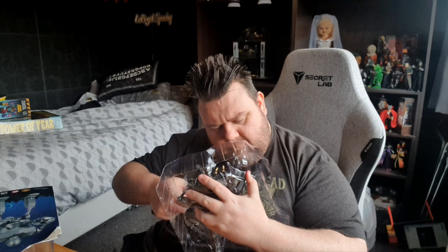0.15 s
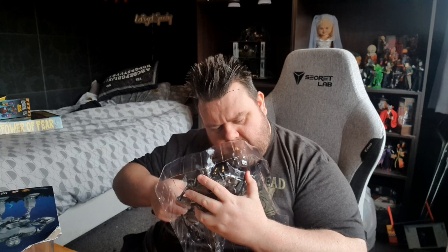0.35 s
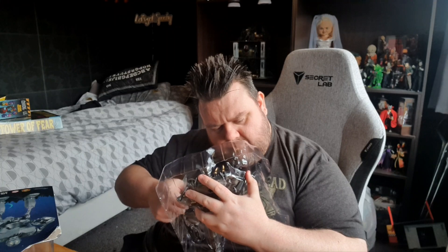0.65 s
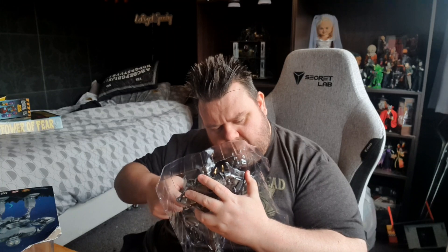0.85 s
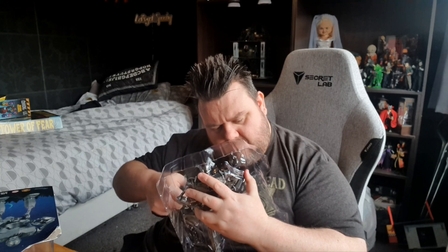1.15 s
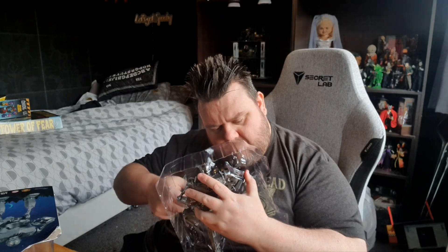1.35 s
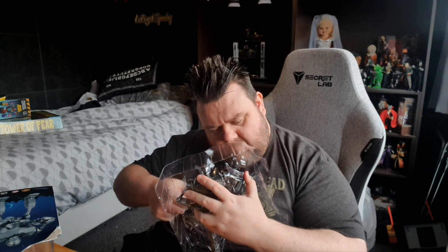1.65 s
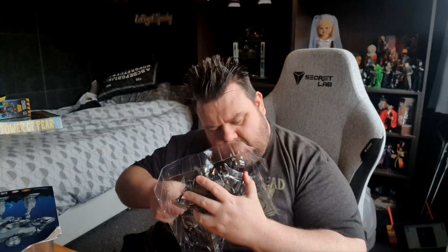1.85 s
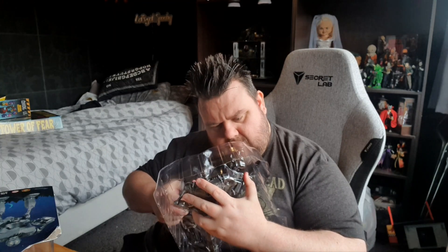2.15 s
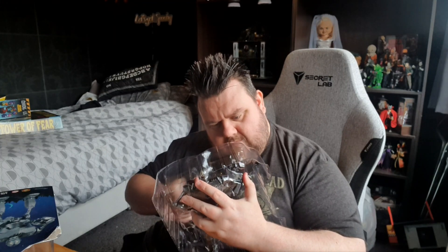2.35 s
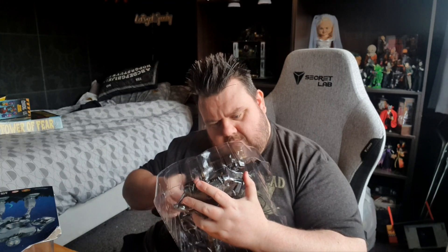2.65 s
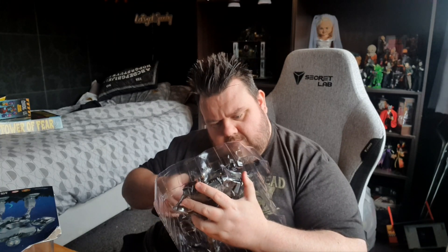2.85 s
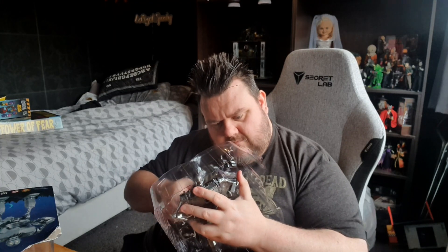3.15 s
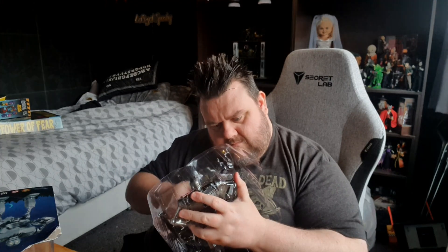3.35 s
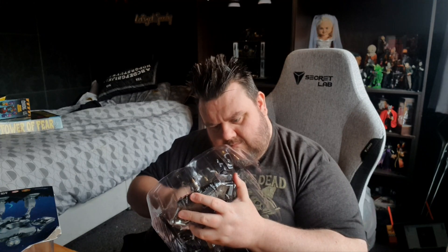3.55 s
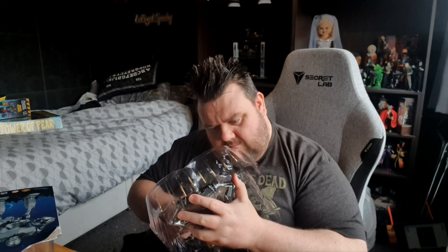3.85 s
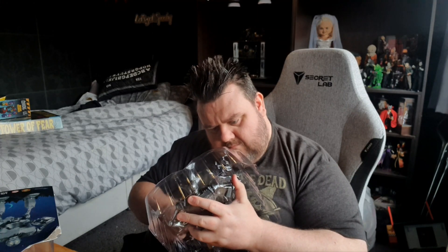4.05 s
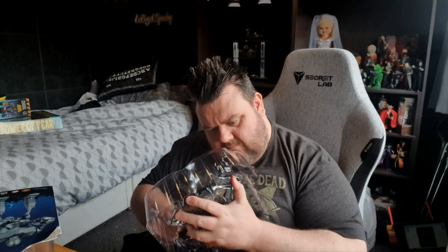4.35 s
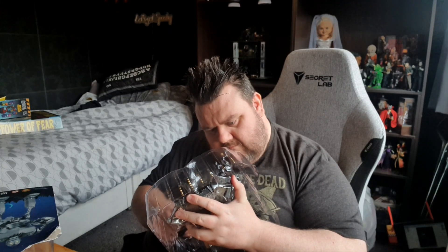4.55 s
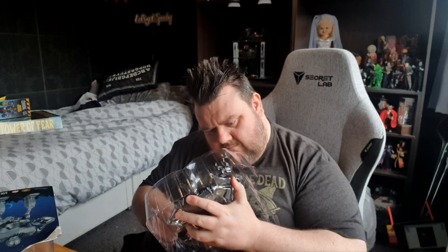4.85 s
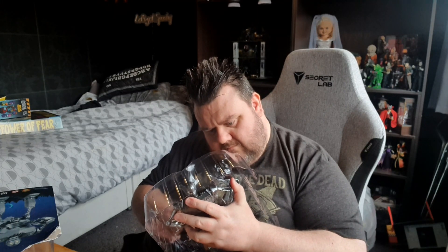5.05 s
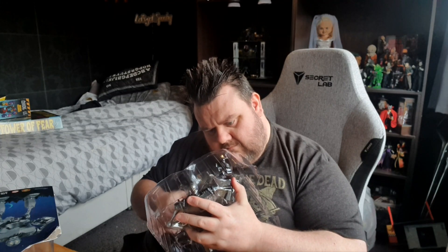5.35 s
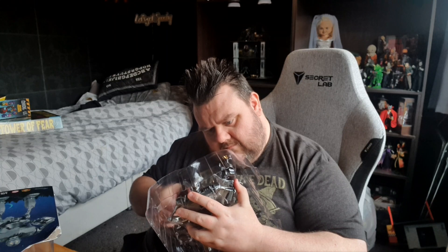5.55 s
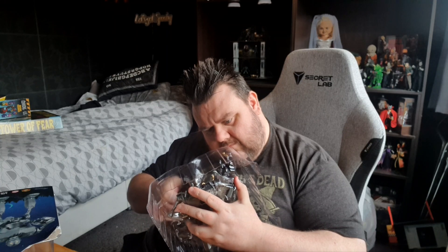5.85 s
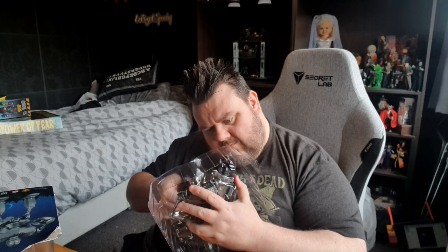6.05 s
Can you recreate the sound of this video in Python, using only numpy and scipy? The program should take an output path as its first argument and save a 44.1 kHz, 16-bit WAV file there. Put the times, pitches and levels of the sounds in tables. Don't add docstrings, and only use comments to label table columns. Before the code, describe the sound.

A stiff plastic tray is flexed close to a stereo microphone in a small carpeted bedroom. Sharp cracks and hollow pops come in uneven clusters during the first two seconds, then a lull, a few duller creaks around three, a crackling flurry past four, and one very loud snap at five. Small ticks follow. A low computer fan hums throughout.

```python
import sys
import numpy as np
from scipy import signal
from scipy.fft import rfft, irfft
from scipy.io import wavfile
from scipy.ndimage import uniform_filter1d

SR = 44100
rng = np.random.default_rng(int(sys.argv[2]) if len(sys.argv) > 2 else 0)


def decibels_to_gain(level_db):
    exponent = np.asarray(level_db, float) / 20
    return 10 ** exponent


def waveform_to_disk(signal):
    frames = np.transpose(np.atleast_2d(signal))
    scaled = np.clip(frames, -1, 1) * 32767
    samples = np.round(scaled).astype(np.int16)
    wavfile.write(sys.argv[1], SR, samples)


N = 273619


def rms_one(x):
    return x / np.sqrt(np.mean(x ** 2) + 1e-30)


def peak_one(x):
    return x / np.max(np.abs(x))


def at_hz(points, hz):
    table_hz, values = np.transpose(points)
    return np.interp(np.log(np.maximum(hz, 1)), np.log(table_hz), values)


def filtered(x, order, hz, kind):
    return signal.sosfilt(signal.butter(order, hz, kind, fs=SR, output="sos"), x)


def click_at(s):
    return np.arange(N) == round(s * SR)


def ring(clicks, hz, t60):
    r, w = decibels_to_gain(-60 / (t60 * SR)), 2 * np.pi * hz / SR
    return signal.lfilter([0, np.sin(w)], [1, -2 * r * np.cos(w), r * r], clicks + 1e-18)


def causal(spectrum, size=2048):
    log_gain = np.log(decibels_to_gain(at_hz(spectrum, np.fft.rfftfreq(size, 1 / SR))) + 1e-6)
    cepstrum = irfft(log_gain)
    cepstrum[1:size // 2] *= 2
    cepstrum[size // 2 + 1:] = 0
    return rms_one(irfft(np.exp(rfft(cepstrum)))) / np.sqrt(size)


def drift(rate):
    r = np.exp(-80 * np.pi * rate / SR)
    noise = rng.standard_normal(N // 40 + 2002)
    slow = signal.lfilter([1], [1, -2 * r, r * r], noise)[2000:]
    return np.interp(np.arange(N) / 40, np.arange(len(slow)), rms_one(slow))


def two_ears(mid, side, alike):
    return np.sqrt(1 + alike) * mid + np.sqrt(1 - alike) * side * [[1], [-1]]


# frequency in Hz, left-right likeness from 0 to 1.
LIKENESS = [(60, 0.91), (180, 0.8), (550, 0.79), (1650, 0.044), (4970, 0.029), (15000, 0.03)]


def airy(spectrum):
    hz = np.fft.rfftfreq(N, 1 / SR)
    alike = np.clip(at_hz(LIKENESS, hz), 0, 1)
    mid, side = rfft(rng.standard_normal((2, N)))
    return rms_one(irfft(decibels_to_gain(at_hz(spectrum, hz)) * two_ears(mid, side, alike), N))


# frequency in Hz, level in dB per Hz.
FANS = [(24, -38), (40, -2.5), (127, -7.5), (147, -7), (171, -6.5), (209, -15), (265, -14), (313, -17),
        (370, -11.5), (480, -27.5), (620, -57.5), (1060, -120)]
# frequency in Hz, level in dB per Hz.
HISS = [(400, -20), (500, 0), (640, -4), (800, -8), (1250, -13), (1700, -17), (3900, -22), (4080, -16),
        (4250, -23), (6600, -27), (7600, -32), (12500, -26), (15500, -29), (16200, -60)]
# frequency in Hz, level in dB rms, width of the wander in Hz.
HUM = [(50.6, -62, 15), (78, -63, 6), (120.2, -59, 2), (187.3, -73, 6), (267, -71, 19), (358, -70.5, 12)]


def computer(fans_db=-60, hiss_db=-77):
    out = decibels_to_gain(fans_db) * airy(FANS) + decibels_to_gain(hiss_db) * airy(HISS)
    for hz, level_db, width_hz in HUM:
        phase = 2 * np.pi * np.cumsum(hz + .5 * width_hz * drift(2.7)) / SR
        ear_lag = [[0], [hz / 900]]
        out += decibels_to_gain(level_db + 3.5 + 1.5 * drift(4)) * np.sin(phase + ear_lag)
    return out


# start in seconds, peak in dB, crack in dB, fold pitch in Hz.
SNAPS = [(0.0, -43.5, -19, 885), (0.063, -51.5, -18, 780), (0.442, -16, -9, 697), (0.649, -18, -23, 805),
         (0.708, -27.5, -28.5, 1320), (0.757, -36.5, -31.5, 783), (0.854, -49.5, -18.5, 675),
         (1.057, -36.5, -16.5, 557), (1.067, -23.5, -22, 920), (1.096, -46, -5.5, 910),
         (1.571, -33, -14, 730), (1.926, -17, -17.5, 810), (2.975, -41, -20.5, 746), (3.361, -35, -14, 690),
         (4.377, -43, -16, 800), (4.446, -55, -22, 997), (4.922, -36.5, -18, 774), (4.94, -38.5, -7.5, 897),
         (4.966, -7, -10.5, 707), (5.504, -50, -23.5, 721), (5.602, -55.5, -16.5, 758),
         (5.65, -33, -20, 759)]
# start in seconds, peak in dB, crack in dB,
# fold pitch in Hz.
BRITTLE = [(0.577, -36.5, -8.5, 1260), (0.936, -47.5, -44, 760), (1.333, -45, -6.5, 730),
           (1.416, -48, -32, 715), (1.785, -25, -5.5, 770), (1.87, -18.5, -12.5, 900),
           (1.912, -18, -25, 820), (4.26, -44, -25, 715), (4.424, -45, -25, 840), (5.246, -60, -1, 730),
           (5.736, -50.5, -16, 686)]
# start in seconds, peak in dB, crack in dB, fold pitch in Hz.
FLEXES = [(0.909, -38, -33, 800), (0.995, -36.5, -17.5, 910), (1.245, -51.5, -10.5, 721),
          (1.529, -47.5, -14.5, 748), (3.048, -30.5, -27.5, 1237), (3.096, -32.5, -23, 1235),
          (3.441, -36, -21.5, 750), (3.534, -44.5, -21.5, 600), (4.129, -52.5, -19, 787),
          (4.283, -38, -20.5, 840), (4.329, -28.5, -18, 745), (4.347, -33.5, -12, 703),
          (4.357, -28, -20, 807), (4.399, -30, -19.5, 789), (4.831, -56, -24.5, 823),
          (5.664, -40.5, -12, 639), (5.721, -44.5, -17, 676), (5.846, -34.5, -28, 770),
          (5.911, -56, -11, 1316), (6.133, -53, -10.5, 810)]
# start in seconds, peak in dB.
TICKS = [(1.18, -57.5), (1.389, -59), (1.462, -64), (1.59, -55), (2.849, -64.5), (3.313, -74),
         (3.548, -62.5), (3.669, -61), (4.173, -70), (4.589, -66), (5.561, -72)]


def buckles(middling_db=-40.5):
    ticks = [(s, db, -12, 720) for s, db in TICKS]
    kinds = ((BRITTLE, -3, -4.5), (SNAPS + ticks, -11, 0), (FLEXES, -27, -2))
    rows = []
    for kind, edge_db, share_db in kinds:
        for s, db, crack_db, hz in kind:
            thump_db = -15.5 + share_db - .5 * (db - middling_db)
            rows.append((s, db, thump_db, crack_db, crack_db + edge_db, hz))
    return sorted(rows)


# frequency in Hz, level in dB, t60 in seconds.
PANELS = [(195, -1, 0.058), (337, 1.5, 0.07), (381.8, 1.5, .08), (435.2, 4, 0.085), (630, -3.5, 0.023)]
# frequency in Hz, level in dB per Hz.
CRACK = [(710, -61.5), (1200, -3), (1910, -3), (2060, -3.5), (2560, -2), (3050, -6.5), (3550, -5),
         (7330, -22), (11700, -21.5), (16000, -33)]
# ratio to the fold pitch, level in dB.
FOLD = [(.7, -23), (.86, -6), (1.001, 11.5), (1.219, 6), (1.5, -1.5), (1.899, -28)]


def volley(crack_db, t, volley_db=-3, drag=.28):
    common, gate = rng.standard_normal((2, len(t)))
    echoes = (np.abs(gate) > 1.6) * (.6 * common + .8 * rng.standard_normal((2, len(t))))
    echoes += signal.lfilter([.05], [1, -.95], echoes[::-1] - echoes) / 2
    length_s = .006 * decibels_to_gain(drag * np.clip(-14 - crack_db, 0, 25))
    out = (t == 0) + decibels_to_gain(volley_db) * echoes * np.exp(-(t / length_s) ** 2) * (t > .0003)
    return out / np.sqrt(np.sum(out ** 2) / 6)


def snaps(facing=.5, panels_db=4, crack_gain_db=9, edge_gain_db=9, folds_db=-9, pan_db=-.17, size=4096):
    sent, near, t = np.zeros(N + size), np.zeros((2, N + size)), np.arange(size) / SR
    click = (t == 0) * 1.
    pulse = causal(CRACK, size=size)
    crack, edge = (peak_one(filtered(pulse, 2, 5000, kind)) for kind in ("low", "high"))
    push = np.diff(signal.lfilter([1], [1, -1.7, .7225], click), prepend=0)
    knock = filtered(click, 2, 2500, "low")
    for s, level_db, thump_db, crack_db, edge_db, hz in buckles():
        thump, fold = np.zeros(size), np.zeros(size)
        for panel_hz, db, t60 in PANELS:
            thump += decibels_to_gain(db + 9.9 * rng.standard_normal()) * ring(push, panel_hz, t60)
        for ratio, db in FOLD:
            detune = decibels_to_gain(.3 * rng.standard_normal())
            fold += decibels_to_gain(db) * ring(knock, hz * ratio * detune, 25 / hz)
        snap = decibels_to_gain(thump_db + panels_db) * peak_one(thump) + decibels_to_gain(folds_db) * peak_one(fold)
        snap += decibels_to_gain(crack_db + crack_gain_db) * crack
        snap -= decibels_to_gain(edge_db + edge_gain_db) * edge
        at = round((s + .00067) * SR)
        sent[at:at + size] += decibels_to_gain(level_db) * snap
        aim_db = facing * max(level_db + 16, 0)
        heard = signal.fftconvolve(volley(crack_db, t), [snap], axes=1)[:, :size]
        near[:, at:at + size] += decibels_to_gain(level_db + aim_db) * heard
    return sent[:N], near[:, :N] * decibels_to_gain([[pan_db], [-pan_db]])


# frequency in Hz, level in dB per Hz.
RUB = [(250, -23), (500, 4), (900, 0.5), (1500, -3.5), (2500, -25), (6000, -46)]
# frequency in Hz, level in dB per Hz.
FIZZ = [(900, -27), (2000, 0.5), (3000, 3.5), (5000, -4), (6800, -6), (7800, -24), (16000, -29)]
# moment of most pressure in seconds, rub in dB, seconds to fade 20 dB either side.
STROKES = [(0.03, -77, 1.1), (0.75, -62, 0.04), (1.04, -62, 0.16), (1.36, -65.5, 0.86), (1.588, -62, 0.27),
           (3.0, -68, 1), (3.39, -65, 0.04), (3.53, -65, 0.17), (4.32, -62.5, 0.23), (4.6, -83.5, .5),
           (4.91, -64, 0.24), (5.62, -73, 1), (5.92, -73, 0.8)]


def rustle(per_s=1200, spread_db=3, clump_db=4, fizz_db=-11.5):
    t = np.arange(N) / SR
    rub_db = np.max([db - 20 * np.abs(t - s) / fade_s for s, db, fade_s in STROKES], axis=0)
    sizes = decibels_to_gain(spread_db * np.minimum(rng.exponential(1, N), 4)) * rng.choice([-1, 1], N)
    ticks = sizes * (rng.random(N) < per_s / SR) * decibels_to_gain(clump_db * drift(25))
    rub, fizz = (rms_one(signal.fftconvolve(ticks, causal(colour))[:N]) for colour in (RUB, FIZZ))
    return decibels_to_gain(rub_db - 5) * (rub + decibels_to_gain(fizz_db) * fizz)


# start in seconds, peak in dB, pitch in Hz.
POPS = [(0.445, -25, 400), (0.579, -34, 410), (0.652, -27, 430), (0.707, -29.5, 420), (0.713, -33, 1300),
        (0.909, -35, 900), (1.066, -27, 884), (1.786, -23, 480), (1.788, -22, 850), (1.928, -20, 370),
        (1.929, -21, 800), (3.049, -37, 700), (3.096, -46.5, 328), (3.361, -31, 361), (3.362, -39.5, 720),
        (3.44, -34.5, 378), (3.548, -31, 363), (3.673, -38.5, 351), (4.355, -36, 336), (4.42, -36, 900),
        (4.832, -44, 750), (4.968, -15, 430), (5.664, -28, 626), (5.651, -38, 1320), (5.722, -35, 660),
        (5.847, -43, 1250), (5.912, -48, 1350), (5.846, -36.5, 331), (6.133, -42.5, 462)]


def panel_pops():
    pops = sum(decibels_to_gain(db - 4.5) * ring(click_at(s), hz, 24 / hz) for s, db, hz in POPS)
    return filtered(pops, 2, [200, 1800], "band")


# start in seconds, level in dB, pitch in Hz, t60 in seconds.
TINGS = [
    (3.097, -67, 1850, .3),
    (0.858, -80, 5250, .2),
    (1.54, -70, 3500, .08),
]


def tool():
    return sum(decibels_to_gain(db) * ring(click_at(s), hz, t60) for s, db, hz, t60 in TINGS)


# frequency in Hz, level in dB, t60 in seconds.
BEAMS = [(2530, -10, .025), (3480, -12, .018)]


def beam():
    s = max(SNAPS, key=lambda row: row[1])[0] + .001
    return sum(decibels_to_gain(db) * ring(click_at(s), hz, t60) for hz, db, t60 in BEAMS)


# frequency in Hz, t60 in seconds.
ROOM_T60 = [(150, 0.2), (500, 0.18), (2000, 0.195), (6000, 0.2), (14000, 0.074)]


def room(x, tail_db=-25, build_s=.0055, treble_db=3, size=16384):
    t, edges = np.arange(size) / SR, 60 * 2 ** np.arange(0, 8.6, .5)
    white, tail = rng.standard_normal((2, 2, size)), np.zeros((2, size))
    for k, (low, high) in enumerate(zip(edges, edges[1:])):
        alike = np.clip(at_hz(LIKENESS, low), 0, 1)
        mid, side = filtered(white[k % 2], 2, [low, high], "band")
        decay_db = treble_db * max(np.log2(low / 3000), 0) - 60 * t / at_hz(ROOM_T60, low)
        tail += two_ears(mid, side, alike) * decibels_to_gain(decay_db)
    lumps = uniform_filter1d(rng.standard_normal((2, size)), size=40, axis=1) ** 2
    early = np.exp(-t / .06)
    tail *= rms_one(.35 + lumps / lumps.mean() * early) / rms_one(.35 + np.sqrt(3) * early)
    tail *= decibels_to_gain(tail_db) * (1 - np.exp(-(t / build_s) ** 2))
    return signal.fftconvolve([x], tail, axes=1)[:, :N]


def scene():
    sent, near = snaps()
    rub, held = rustle(), panel_pops() + tool()
    reverb = room(sent + rub + decibels_to_gain(-3) * held)
    return near + beam() + rub + held + reverb + computer()


def band_limit(x):
    return signal.sosfilt(signal.butter(12, 16640, fs=SR, output="sos"), x)


def record(dry):
    cut = filtered(dry, 4, 42, "high")
    cut = signal.sosfilt(signal.cheby2(10, 50, 16600, fs=SR, output="sos"), cut)
    rounded = 1.15 * np.tanh(cut / 1.15)
    return band_limit(rounded)


dry = scene()
out = record(dry)
waveform_to_disk(out)
```